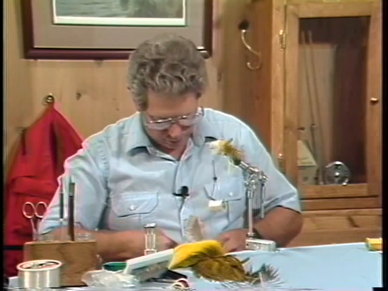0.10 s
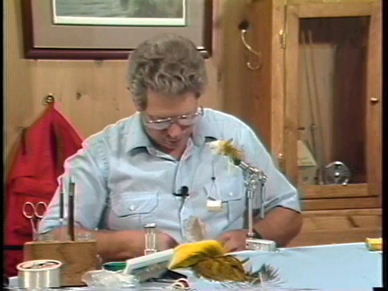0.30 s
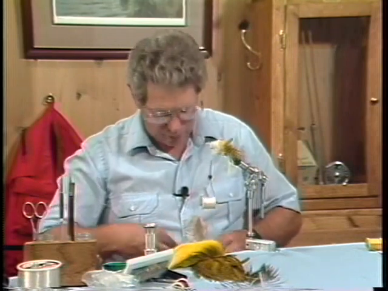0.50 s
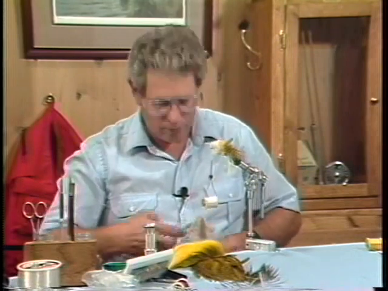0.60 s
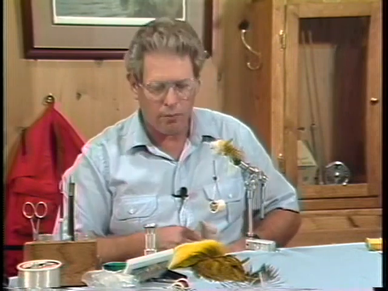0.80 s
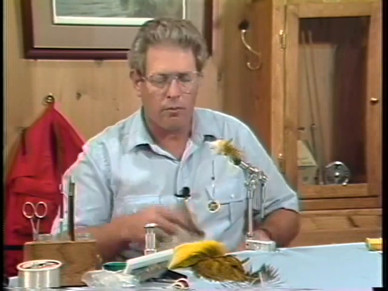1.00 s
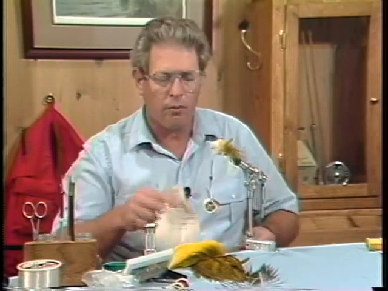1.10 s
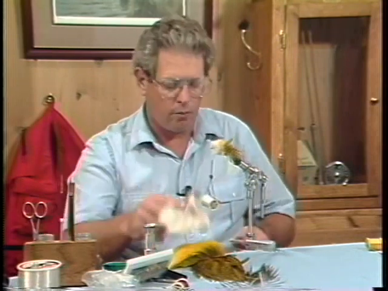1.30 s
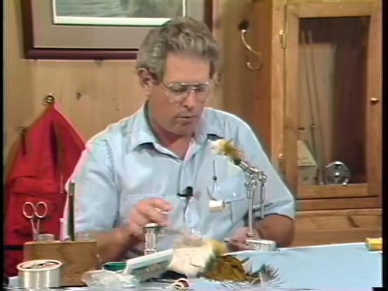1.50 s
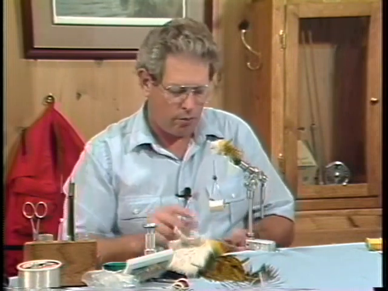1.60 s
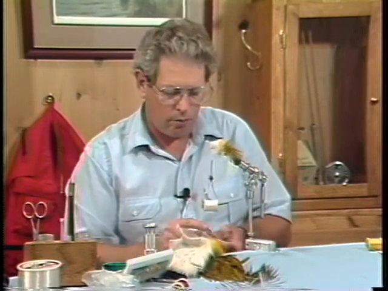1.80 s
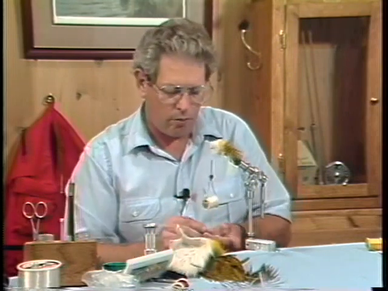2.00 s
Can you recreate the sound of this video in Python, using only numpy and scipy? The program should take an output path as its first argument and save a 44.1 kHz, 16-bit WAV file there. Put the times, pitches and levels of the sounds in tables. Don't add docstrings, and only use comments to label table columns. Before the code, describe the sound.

Small scissors snip once through a clump of hair, with soft rustling and low desk bumps.

```python
import sys
import numpy as np
from scipy import signal
from scipy.fft import rfft, irfft
from scipy.io import wavfile
from scipy.ndimage import uniform_filter1d

SR = 44100
rng = np.random.default_rng(int(sys.argv[2]) if len(sys.argv) > 2 else 0)


def store_pcm(level_fs):
    pcm = np.round(np.clip(level_fs, -1, 1) * 32767).astype(np.int16)
    wavfile.write(sys.argv[1], SR, np.atleast_2d(pcm).T)


def undo_db(level):
    steps = np.asarray(level, float) / 20
    return 10 ** steps


N = 88200


def evened(x):
    return x / np.sqrt(np.mean(x ** 2) + 1e-20)


def coloured(x, points):
    hz, db = np.transpose(points)
    bins_hz = np.fft.rfftfreq(len(x), 1 / SR)
    gain_db = np.interp(np.log(bins_hz + 1), np.log(hz + 1), db)
    return irfft(rfft(x) * undo_db(gain_db), len(x))


def add(mix, s, sound):
    part = mix[round(s * SR):][:len(sound)]
    part += sound[:len(part)]


def resonate(x, hz, width_hz):
    turn = np.exp(2j * np.pi * hz * np.arange(len(x)) / SR)
    r = np.exp(-np.pi * width_hz / SR)
    smooth = signal.lfilter([1 - r], [1, -r], x / turn)
    return 2 * (turn * smooth).real


def grains(per_s, spread_db):
    size = undo_db(spread_db * np.minimum(rng.exponential(1, N), 4)) * rng.standard_normal(N)
    return evened(size * (rng.random(N) < per_s / SR))


def level(table, column):
    rows = np.array(table)
    db = np.interp(np.arange(N) / SR, rows[:, 0], rows[:, column], left=-120, right=-120)
    return undo_db(db)


def floor():
    # frequency in Hz, density in dB per Hz.
    room_and_tape = [(14, -29.5), (30, -1.5), (63, -3.5), (200, -14.5), (300, -11.5), (400, -21),
                     (12500, -24), (14000, -24.5)]
    # multiple of the mains frequency, level in dB rms.
    harmonics = [(1, -68), (2, -72), (3, -71), (4, -67.5), (5, -80), (7, -78), (9, -79), (12, -83)]
    mains_hz = 60
    t = np.arange(N) / SR
    hum = np.zeros(N)
    for k, db in harmonics:
        phase = 2 * np.pi * (round(k) * mains_hz * t + rng.random())
        hum += undo_db(db) * np.sqrt(2) * np.sin(phase)
    return undo_db(-57.5) * evened(coloured(rng.standard_normal(N), room_and_tape)) + hum


def rustle():
    # time in seconds, hair rustle in dB, cloth rub in dB, low rumble in dB.
    motion = [(0, -64, -64, -57), (.04, -58, -66, -60), (.11, -65.5, -78, -65.5), (.2, -56, -64, -51.5),
              (.262, -61, -65, -60), (.33, -58, -72, -51), (.37, -51.5, -50.5, -66), (.42, -59, -62, -59),
              (.47, -50.5, -63, -57.5), (.51, -63.5, -66.5, -58.5), (.78, -67.5, -78, -62),
              (.805, -47, -59.5, -56), (.89, -54, -65, -55.5), (.93, -59.5, -59.5, -58.5),
              (1.05, -62, -61.5, -58.5), (1.21, -71.5, -85, -69), (1.3, -62, -64.5, -55),
              (1.5, -71.5, -92, -71)]
    # frequency in Hz, level in dB.
    hair_colour = [(1500, -30), (4000, -15.5), (6000, -8), (8500, -3), (11000, -7), (14000, -19.5)]
    cloth_colour = [(200, -20), (500, 4.5), (1500, 1), (4000, -2), (8000, -9), (14000, -31)]
    rumble_colour = [(25, -21), (60, -7.5), (150, 2), (300, -8), (700, -16), (1500, -39)]
    gusts = rng.standard_normal((2, N))
    for _ in range(2):
        gusts = uniform_filter1d(gusts, 130, axis=1)
    gusts = evened(gusts)
    hair = evened(coloured(grains(per_s=16000, spread_db=1.5), hair_colour))
    hair = hair * undo_db(1.74 * gusts[0])
    cloth = evened(coloured(rng.standard_normal(N), cloth_colour))
    cloth = cloth * undo_db(1.2 * gusts[1])
    rumble = evened(coloured(grains(per_s=400, spread_db=1.46), rumble_colour))
    return hair * level(motion, 1) + cloth * level(motion, 2) + rumble * level(motion, 3)


def bumps():
    # start in seconds, peak in dB, pitch in Hz, length in seconds.
    knocks = [(.005, -47, 50, 0.078), (0.067, -47.5, 51.3, 0.058), (0.129, -50.5, 68.6, 0.071),
              (0.198, -45.5, 278, 0.029), (.2195, -40.5, 301, 0.014), (.232, -45, 298, 0.026),
              (0.2373, -41.5, 520, 0.0026), (.222, -40, 156, 0.023), (0.2278, -32, 61.5, 0.068),
              (0.317, -43, 59.6, 0.049), (0.347, -34.5, 468, 0.0074), (.355, -27, 144.5, .022),
              (.357, -49.5, 240, 0.036), (0.3746, -27, 52.2, 0.063), (0.378, -32.5, 123, 0.019),
              (0.538, -40.5, 54.4, 0.081), (0.652, -46.5, 52, 0.039), (0.809, -46.5, 62.4, 0.071),
              (0.846, -36.5, 136.3, 0.023), (.854, -42, 187, 0.022), (0.841, -50.5, 1140, 0.0094),
              (.851, -35.5, 68, 0.058), (0.928, -49, 50.6, 0.036), (1.014, -58, 59.5, 0.055),
              (1.243, -47.5, 258, 0.011), (1.2493, -37, 88, 0.032), (1.273, -45.5, 60, 0.034),
              (1.32, -50, 148, 0.024), (1.342, -54, 290, 0.016), (1.42, -52, 59.3, 0.022)]
    skew, sag = 0.57, 0.44
    out = np.zeros(N)
    for s, db, hz, length_s in knocks:
        u = np.arange(0, length_s, 1 / SR) / length_s
        pitch_hz = hz * (1 + sag * (np.exp(-4 * u) - 0.2))
        turns = np.cumsum(pitch_hz) / SR
        swell = np.sin(np.pi * u ** skew) ** 1.15
        add(out, s, undo_db(db) * swell * np.sin(2 * np.pi * turns))
    return out


def ticks():
    # start in seconds, peak in dB, colour in Hz, width of the colour in Hz.
    snaps_and_ticks = [(.155, -46, 8000, 4000), (.1998, -37, 9200, 7000), (.2003, -44, 4500, 1500),
                       (.2068, -38, 9700, 4000), (.2075, -45, 4500, 1500), (.2093, -33, 9500, 6000),
                       (.2241, -28, 9300, 4000), (.2343, -40, 9000, 7000), (.2385, -35, 6800, 7000),
                       (.245, -43, 8000, 6000), (.2515, -29, 9000, 4500), (.2897, -40, 9000, 7000),
                       (.297, -25, 8600, 8000), (.297, -42, 1400, 1500), (.3028, -44, 9500, 5000),
                       (.4315, -45, 6500, 5000), (.455, -41, 8500, 5000), (.496, -43, 8000, 6000),
                       (.337, -27, 7600, 7000), (.4003, -30, 6400, 1200), (.592, -42, 7900, 5000),
                       (.797, -40, 9000, 3000), (.8003, -31, 8600, 2000), (.8033, -30, 9300, 2000),
                       (.8058, -31, 9000, 2000), (.815, -38, 7800, 2000), (.844, -50, 3600, 600),
                       (.963, -44, 8900, 7000), (1.146, -45, 9100, 8000)]
    t60_s, edge, wide_db = 0.007, 2.5, -24
    out = np.zeros(N)
    t = np.arange(800) / SR
    for s, db, hz, width_hz in snaps_and_ticks:
        crack = rng.standard_normal(len(t)) * undo_db(-60 * t / t60_s)
        crack[0] += edge
        ring = resonate(resonate(crack, hz, width_hz), hz, width_hz)
        tick = evened(ring) + undo_db(wide_db) * evened(crack)
        add(out, s, undo_db(db) * tick / abs(tick).max())
    return out


def cut():
    # time in seconds, level in dB.
    pressure = [(.341, -54), (.3454, -45), (.3458, -31), (.3495, -31), (.354, -32), (.3553, -24),
                (.3575, -26), (.3595, -33), (.362, -48)]
    # time in seconds, strength in dB.
    clack = [
        (.3567, -12),
        (.3572, -6),
        (.358, -11),
    ]
    # frequency in Hz, width in Hz, level in dB.
    steel = [(520, 570, -11.5), (1130, 140, -35), (1665, 330, -2.5), (3110, 230, -1.5), (4350, 306, -2),
             (5250, 390, 0.5), (6770, 720, 3.5), (8200, 340, 3.5), (10380, 1140, 2), (12600, 1500, -24)]
    strikes = grains(per_s=14000, spread_db=2) * level(pressure, 1)
    for s, db in clack:
        add(strikes, s, undo_db([db]))
    ringing = np.zeros(N)
    for k, (hz, width_hz, db) in enumerate(steel):
        sign = (-1) ** k
        ringing += sign * undo_db(db) * resonate(strikes, hz, width_hz)
    return ringing * undo_db(5.5)


def scene():
    mono = floor() + rustle() + bumps() + ticks() + cut()
    return np.array([mono, mono])


def top_cut(x):
    return signal.sosfilt(signal.butter(12, 14540, fs=SR, output="sos"), x)


def record(dry):
    # frequency in Hz, level in dB.
    side_colour = [(4500, -26), (6800, -0.5), (8200, -24), (9300, 1), (10600, -27), (11500, -17),
                   (12700, -0.5), (13700, -14)]
    treble_power = abs(uniform_filter1d(np.gradient(dry[0]) ** 2, 600))
    follow = treble_power ** (0.65 / 2)
    side = undo_db(-43) * follow * evened(coloured(rng.standard_normal(N), side_colour))
    drift = evened(uniform_filter1d(rng.standard_normal(N), 2500))
    side = side * undo_db(1.6 * drift)
    band_limit = signal.firwin(255, 13680, window=("kaiser", 5), fs=SR)
    mix = signal.oaconvolve(dry + np.array([side, -side]), band_limit[None], "same")
    return top_cut(mix)


dry = scene()
out = record(dry)
store_pcm(out)
```